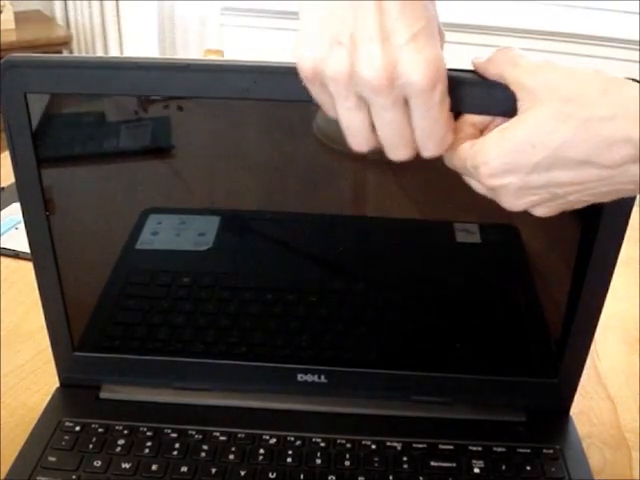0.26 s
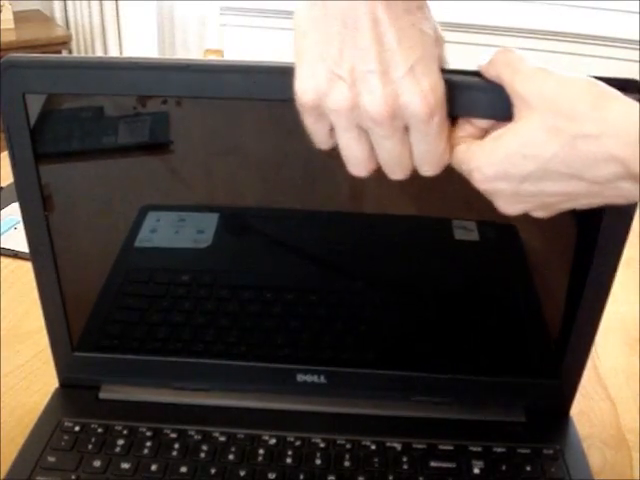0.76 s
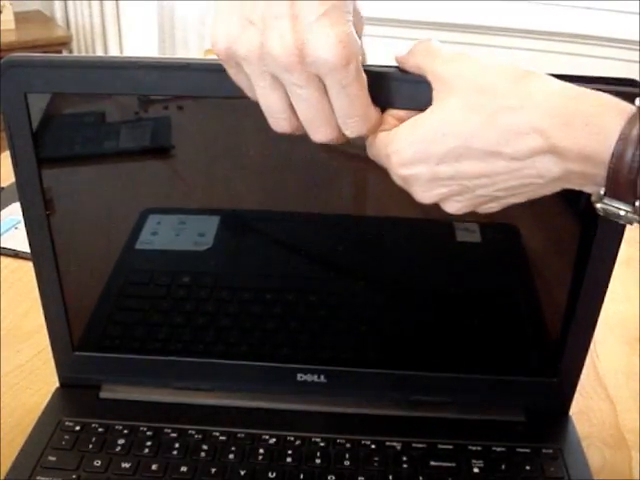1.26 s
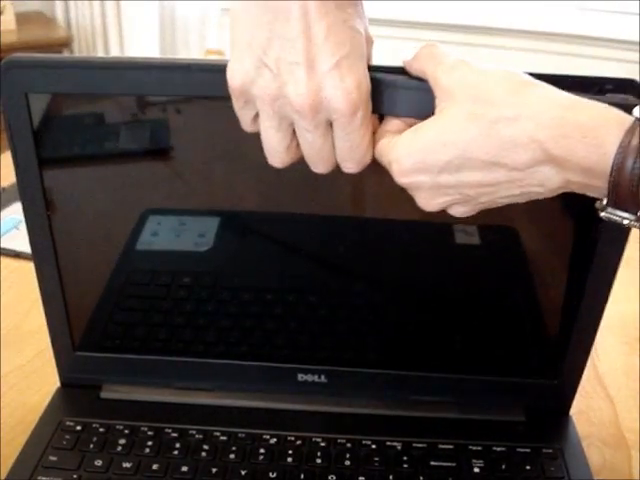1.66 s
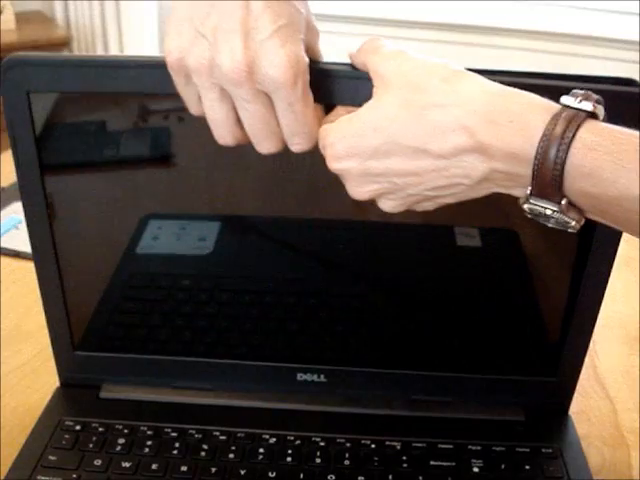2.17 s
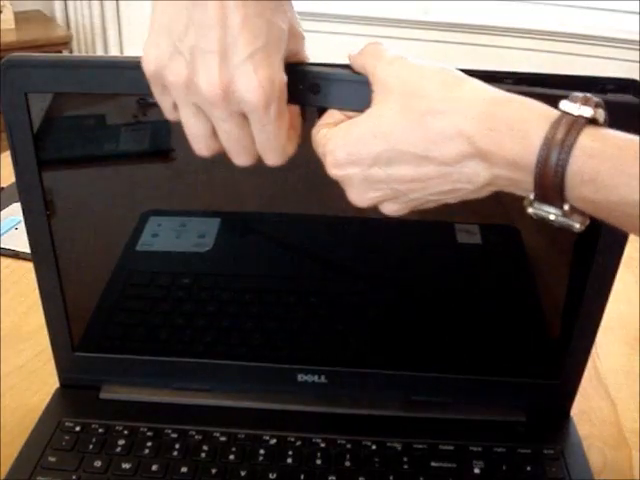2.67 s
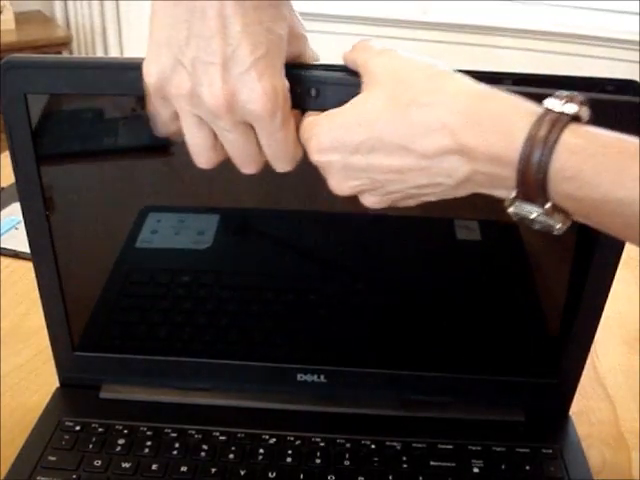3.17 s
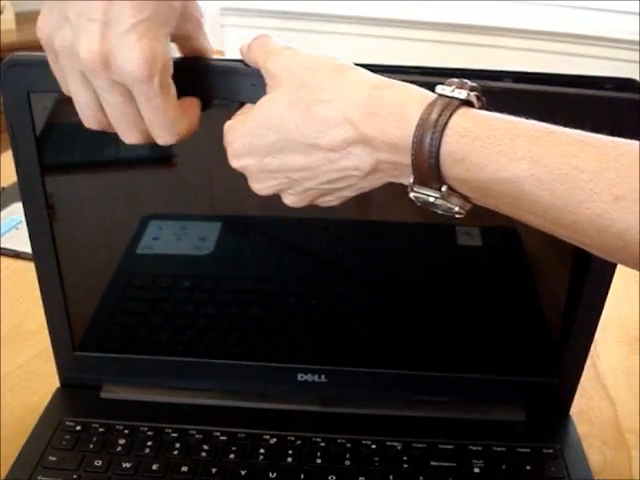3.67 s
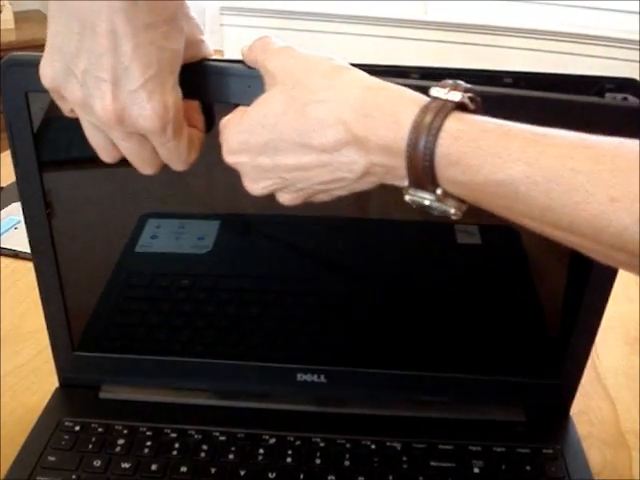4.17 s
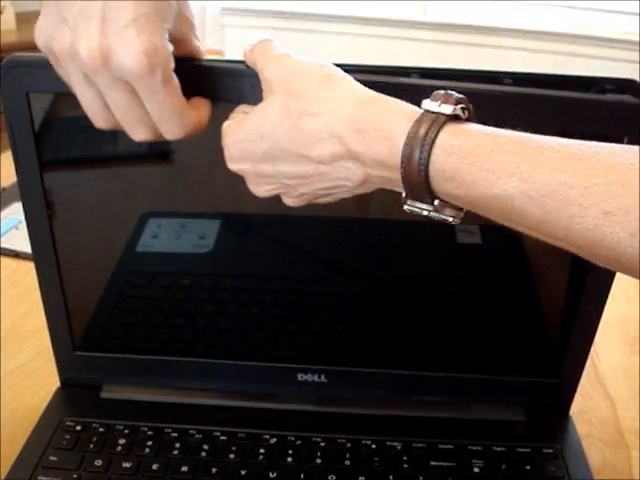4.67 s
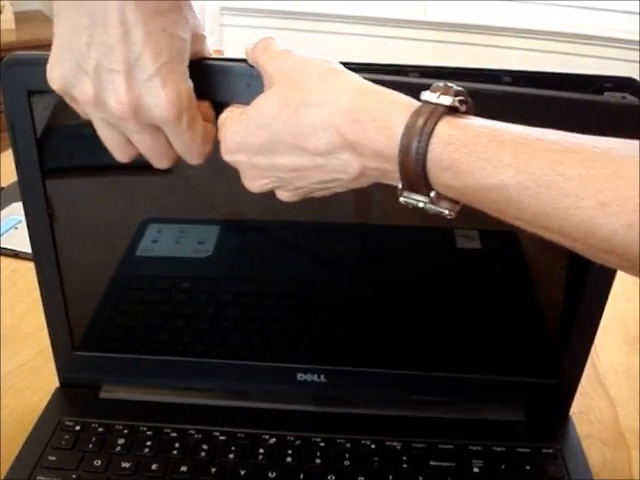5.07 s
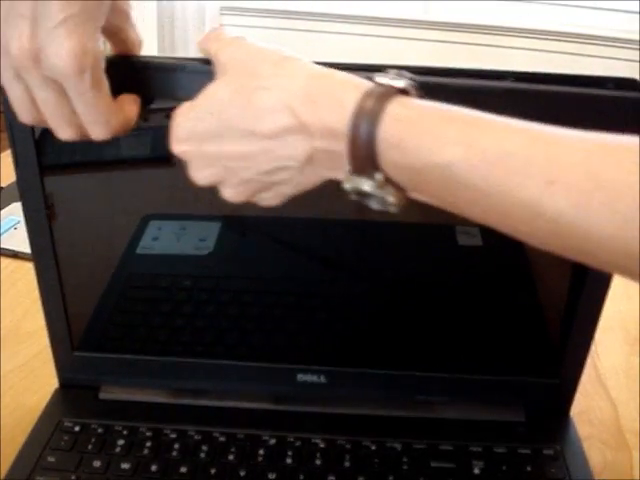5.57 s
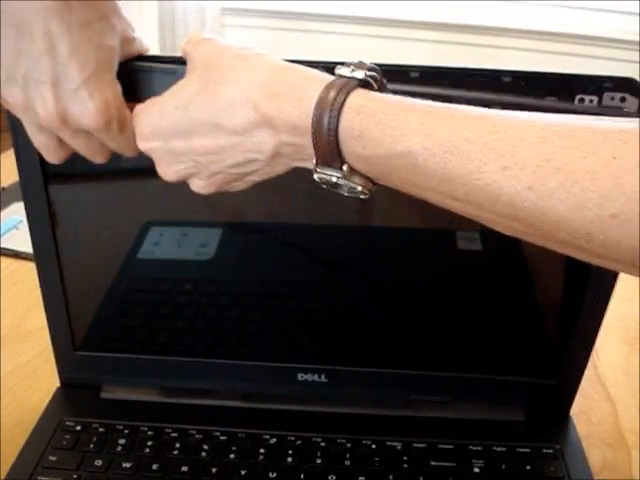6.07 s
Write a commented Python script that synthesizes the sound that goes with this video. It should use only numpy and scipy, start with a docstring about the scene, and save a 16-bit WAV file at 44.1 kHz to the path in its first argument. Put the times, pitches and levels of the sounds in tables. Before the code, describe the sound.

Hands pry the plastic frame off a laptop screen, and five clips pop loose one by one, a second or two apart. Each gives a sharp, bright snap that rings briefly in the frame and the small, hard-walled room. Between the later snaps come faint ticks of strained plastic, light taps and soft bumps of a hand. The microphone is close, with quiet room hiss underneath.

```python
"""A small, hard-walled room, one microphone close to a laptop whose plastic bezel is pried off by hand.
Over quiet room noise with faint whines, a clip jumps off its ledge at 0.6 s and another at 1.6 s.
Each crack rings the frame and fills the room; the freed strip settles on the lid, and the noise, which
dips at the snap, creeps back. From 2 s the strained plastic ticks, the strip taps and a hand softly
bumps the lid, while three more clips let go at 3.0, 5.1 and 6.1 s."""
import sys
import numpy as np
from scipy import signal
from scipy.fft import rfft, irfft, next_fast_len
from scipy.io import wavfile
from scipy.ndimage import map_coordinates

SR = 44100
rng = np.random.default_rng(int(sys.argv[2]) if len(sys.argv) > 2 else 0)


def dump_mix(stems):
    """Bounce the given channels to the path in sys.argv[1] as a 16-bit WAV at rate SR."""
    frames = np.atleast_2d(stems).T  # one column per channel
    limited = np.clip(frames, -1, 1)  # hard clip at full scale
    pcm = np.round(limited * 32767).astype(np.int16)
    wavfile.write(sys.argv[1], SR, pcm)


N = 279153

# clips letting go: t/s, level/dB, crack/dB, body/dB, frame/dB, edge/dB, fizz/dB, hook f/Hz, hook ring/dB
CLIP_RELEASES = [(0.5802, -2.5, 0.5, 5.5, -6.5, -4.5, -4.5, 3060, 4.5),
                 (1.6279, -3.5, 2, 6.5, -3.5, -5.5, -3, 4130, 4.5),
                 (2.9874, 0, 0, -0.5, 0, -7, -5.5, 2800, 4), (5.1015, 0.5, 1, 6, 0, -6, -4, 4060, 4.5),
                 (6.0659, -1.5, 3.5, -0.5, -1.5, -8.5, -9.5, 2530, 4)]
# spectrum of the plastic's ticks and of the hiss before a snap: f/Hz, level/dB
TICK_SPECTRUM = [(100, -34), (1000, -31), (1350, -4.5), (1800, -20), (2350, -0.5), (2750, -5), (3500, 6.5),
                 (4300, 0), (5200, -8), (10000, -19.5)]


def clips():
    """A faint hiss swells for about 3 ms, then each hook lets go with a one-sided pressure spike."""
    track = np.zeros(N)
    lead = np.arange(-SR // 300, SR // 2000) / SR  # seconds around the release
    for s, db, *tone in CLIP_RELEASES:
        lead_in_hiss = amp(-31) * noise(lambda hz: along(TICK_SPECTRUM, hz), len(lead))
        lead_in_hiss *= np.exp(lead / .0015)
        spike = -amp(-7.8) * np.exp(-(lead / .00008) ** 2)
        add(track, s + lead[0], lead_in_hiss + spike)
        add(track, s + .00015, amp(db) * snap(*tone))
    return track


def snap(crack_db, body_db, frame_db, edge_db, fizz_db, hook_hz, hook_db):
    """One clip as it reaches the microphone: the crack, the ringing frame, first echoes, then the room."""
    spectrum = [(30, -35), (110, -27.5), (280, -15.5), (550, -13.5), (850, -11), (1100, -.5), (1550, -2.5),
                (2600, -3), (3800, 1.5), (4500, -3.5), (6200, -6), (8200, -12), (10000, -17.5)]  # snapping plastic: f/Hz, level/dB
    echoes = [(0.0116, -18), (.028, -21)]  # scattered returns from desk and near walls: delay/s, level/dB
    t = np.arange(SR // 2) / SR
    # the place along the edge decides which regions of the spectrum are driven
    place = [(250, body_db / 2), (600, body_db), (1300, frame_db), (2500, 0.0073),
             (4200, edge_db), (8000, fizz_db)]
    hook = lambda hz: hook_db * np.exp(-((hz - hook_hz) / 200) ** 2)
    colour = lambda hz: along(spectrum, hz) + along(place, hz) + hook(hz)
    thin = lambda hz: colour(hz) + along([(500, -9), (1200, 8.5)], hz)  # a small hook radiates little bass
    sound = amp(crack_db - 17.5) * noise(thin, len(t)) * amp(-60 * t / 0.051)
    sound += amp(-21) * frame_ring(t, place, scatter_db=3.0) * (1 - np.exp(-t / 0.0044))
    for delay, db in echoes:
        add(sound, delay, amp(db) * burst(colour, rise_s=0.0015, t60=0.06))
    return sound + amp(-24.5) * room_tail(colour, hold_s=0.033, build_s=0.0022)


def frame_ring(t, place, scatter_db):
    """The frame's modes; every clip that opens changes their strength and, slightly, their pitch."""
    modes = [(145.6, -32.5, 0.42), (274, -24.5, 0.31), (433, -26, 0.4), (542, -26, 0.29),
             (1062, -25.5, 0.54), (1113, -20, 0.18), (1220, -22, 0.46), (1305, -15, 0.3), (1400, -19, 0.47),
             (1537, -11.5, 0.19), (1883, -10, 0.28), (2055, -21, 0.37), (2500, -32, 0.18), (2720, -25, 0.3),
             (3160, -21, 0.28), (3750, -15, .3)]  # resonances of frame and lid: f/Hz, level/dB, t60/s
    ring = np.zeros(len(t))
    for hz, db, t60 in modes:
        envelope = amp(db + along(place, hz) + scatter_db * rng.standard_normal() - 60 * t / t60)
        ring += envelope * np.sin(2 * np.pi * (hz * rng.normal(1, .006) * t + rng.random()))
    return ring


def strain_ticks():
    """Tiny slips in the strained frame: a few milliseconds of dry crackle."""
    slips = [(2.0899, -38.5, -9, -7), (2.833, -37.5, -7.5, -6), (4.087, -36.5, -6, -8),
             (4.6872, -35.5, 3, -17), (4.9244, -33, -10.5, -6.5), (5.5905, -38.5, -6, -10)]  # slips under strain: t/s, level/dB, low share/dB, high share/dB
    track = np.zeros(N)
    for s, db, low_db, high_db in slips:
        tilt = [(1400, low_db + 16.5), (3500, 0), (7000, high_db + 11)]
        colour = lambda hz: along(TICK_SPECTRUM, hz) + along(tilt, hz)
        slip = burst(colour, rise_s=.0004, t60=.02, hold_s=.002)
        room = amp(-40) * room_tail(colour, hold_s=0.0063, build_s=.005)
        add(track, s, amp(db - 4.5) * (slip + room))
    return track


def strip_taps():
    """The freed strip touches the lid dully: under the hands, as it settles after a snap, and by chance."""
    grip_taps = [(1.994, -49, -15), (2.204, -37.5, 3), (2.224, -43.5, -20), (2.292, -46, -3),
                 (3.475, -45.5, -13), (5.289, -40, -8)]  # contacts as the grip changes: t/s, level/dB, knock/dB
    spectrum = [(70, -14.5), (150, 6), (700, -1.5), (1200, 4.5), (1700, -2), (2400, 0.5), (4000, -3.5),
                (5500, -10), (10000, -22)]  # strip meeting lid: f/Hz, level/dB
    settle_s, light_knock_db = .228, -20  # light contacts hardly knock the lid
    settles = [(s + settle_s, -41.5 + 2.5 * db, light_knock_db) for s, db, *_ in CLIP_RELEASES]
    brushes = [(second + when, -50 - 0.5 * (2 * chance - 1), light_knock_db)
               for second, (when, chance) in enumerate(rng.random(size=(8, 2)))]
    track = np.zeros(N)
    for s, db, knock_db in grip_taps + settles + brushes:
        colour = lambda hz: along(spectrum, hz) + along([(400, knock_db), (1100, 0)], hz)
        contact = burst(colour, rise_s=.001, t60=.06)
        room = amp(-13) * room_tail(colour, hold_s=0.006, build_s=0.0075)
        add(track, s, amp(db - 3) * (contact + room))
    return track


def hand_bumps():
    """A hand shifts its grip: flesh drives only the lowest resonances of the lid."""
    bumps = [(2.245, -49.5), (5.396, -50), (5.437, -53.5)]  # hand on the lid: t/s, level/dB
    dull = [(60, -36), (145, 18.0), (200, -7), (280, 12), (500, -16), (1200, -21), (4000, -60)]
    track = np.zeros(N)
    for s, db in bumps:
        add(track, s, amp(db) * burst(lambda hz: along(dull, hz), rise_s=.002, t60=0.15))
    return track


def room_tail(colour_db, hold_s, build_s):
    """Wall echoes crowd in and hold the level, then each band dies at its own speed."""
    decay_times = [(100, 0.26), (500, 0.36), (1300, 0.34), (3000, 0.32), (6000, 0.29), (10000, 0.25)]  # reverberation of the room: f/Hz, t60/s
    hz, t, bands = signal.stft(noise(colour_db, SR // 2), SR, nperseg=512)
    fade = amp(-60 * np.maximum(t - hold_s, 0) / along(decay_times, hz)[:, None])
    tail = signal.istft(bands * fade, SR, nperseg=512)[1][:SR // 2]
    return tail * (1 - np.exp(-np.arange(SR // 2) / SR / build_s))


def room_tone():
    """Room noise whose lower part dips after each snap, with thin whines that slowly swell and sink."""
    spectrum = [(15, -55), (25, -4), (33, -11.5), (70, -9.5), (181, -0.5), (257, -1), (560, -2), (1050, -6),
                (1820, -9.5), (2170, -10.5), (3860, -13.5), (6700, -19.5), (7780, -18.5), (8390, -21.5),
                (10000, -24.5), (13000, -100), (22000, -120)]  # room noise: f/Hz, level/dB
    tones = [(7570, 30, -76, 2.5), (1810, 15.7, -76.5, -1), (1880, 8.2, -82.5, -3), (3900, 130, -77.5, 2.5),
             (4230, 200, -81.5, 3.5)]  # faint whines: f/Hz, width/Hz, level/dB, swing/dB
    air = amp(-57) * noise(lambda hz: along(spectrum, hz), N)
    low = filtered(air, lambda hz: 1 / (1 + (hz / 1700) ** 2))
    drift = lambda: map_coordinates(rng.standard_normal(40), [np.arange(N) * 4 / SR], mode="mirror")
    whines = sum(amp(db + swing_db * drift()) * whine(hz, width) for hz, width, db, swing_db in tones)
    return air - low + dip(depth_db=5.5, recover_s=0.73) * low + whines


def dip(depth_db, recover_s):
    """A gain that drops at every snap and recovers slowly."""
    t = np.arange(N) / SR
    dips = [(t > s) * np.exp(-np.abs(t - s) / recover_s) for s, *_ in CLIP_RELEASES]
    return amp(-depth_db * np.max(dips, axis=0))


def whine(hz, width_hz):
    """A tone of steady strength whose pitch trembles within a narrow band."""
    tremble = noise(lambda f: -20 * np.log10(1 + (f / width_hz) ** 2), N)
    return unit(np.sin(2 * np.pi * np.cumsum(hz + width_hz / 2 * tremble) / SR))


def burst(colour_db, rise_s, t60, hold_s=0):
    """Coloured noise that rises quickly and, after hold_s, falls 60 dB in t60 seconds."""
    t = np.arange(SR // 2) / SR
    decay = amp(-60 * np.maximum(t - hold_s, 0) / t60)
    return noise(colour_db, len(t)) * decay * (1 - np.exp(-t / rise_s))


def noise(colour_db, size):
    """Noise of rms 1 whose spectrum in dB is a function of frequency."""
    return unit(filtered(rng.standard_normal(size), lambda hz: amp(colour_db(hz))))


def filtered(x, response):
    """Filter x by a gain given as a function of frequency."""
    size = next_fast_len(len(x) + SR // 8)
    return irfft(rfft(x, size) * response(np.fft.rfftfreq(size, 1 / SR)), size)[:len(x)]


def along(points, hz):
    """Read (f/Hz, value) points on a log frequency axis."""
    f, v = np.transpose(points)
    return np.interp(np.log(hz + 1), np.log(f + 1), v)


def amp(db):
    """Decibels to gain."""
    return 10 ** (np.asarray(db) / 20)


def unit(x):
    """Scale to rms 1."""
    return x / np.sqrt(np.mean(x ** 2) + 1e-20)


def add(track, s, sound):
    """Mix a sound into the track at s seconds."""
    part = track[round(s * SR):][:len(sound)]
    part += sound[:len(part)]


def scene():
    """Laptop and room at one microphone."""
    return (clips() + strain_ticks() + strip_taps() + hand_bumps() + room_tone())[None]


def record(dry):
    """The recorder rounds off the highest peaks and keeps nothing above its band limit."""
    ceiling, top_hz = .6, 10200
    rounded = dry[0] / (1 + np.abs(dry[0] / ceiling) ** 4) ** (1 / 4)
    return filtered(rounded, lambda hz: 1 / np.sqrt(1 + (hz / top_hz) ** 200))[None]


dry = scene()
out = record(dry)
dump_mix(out)
```